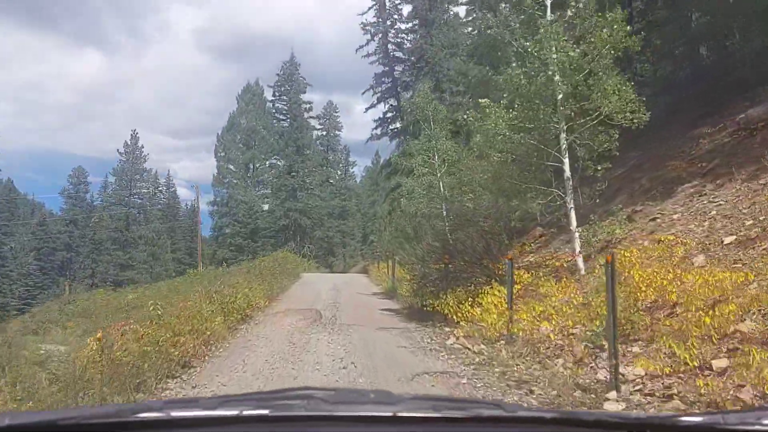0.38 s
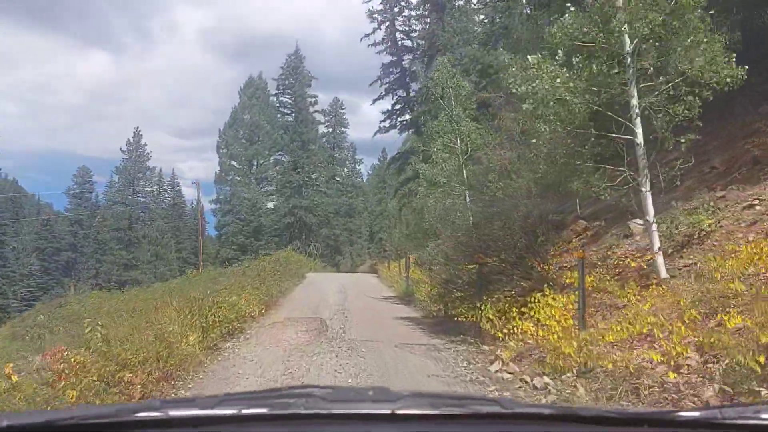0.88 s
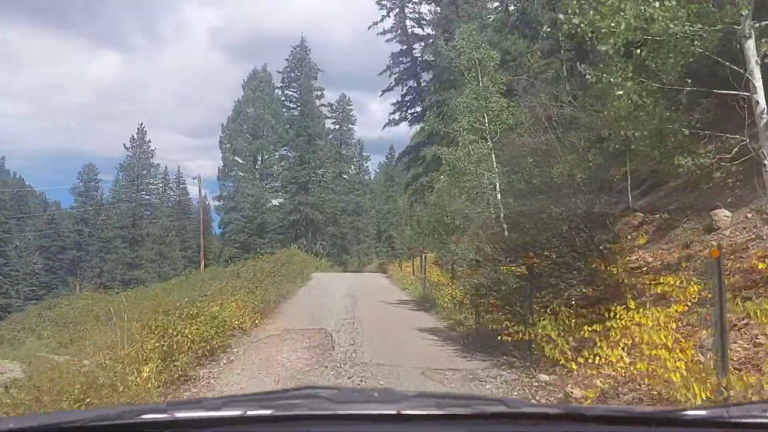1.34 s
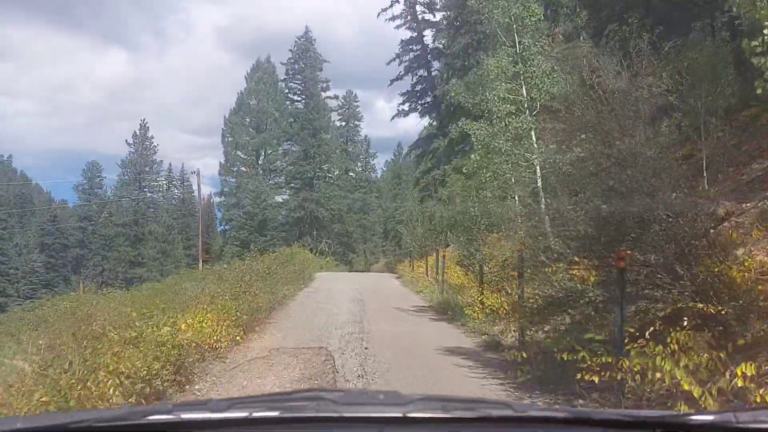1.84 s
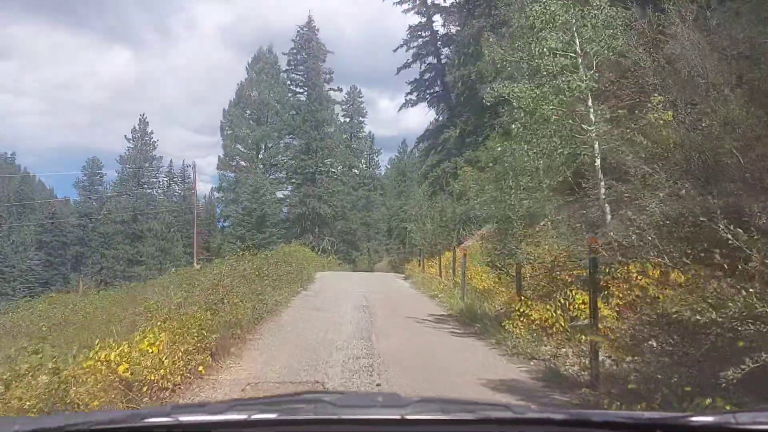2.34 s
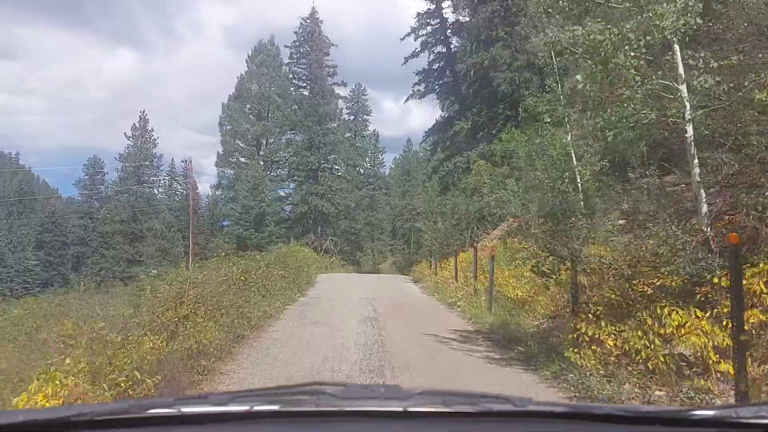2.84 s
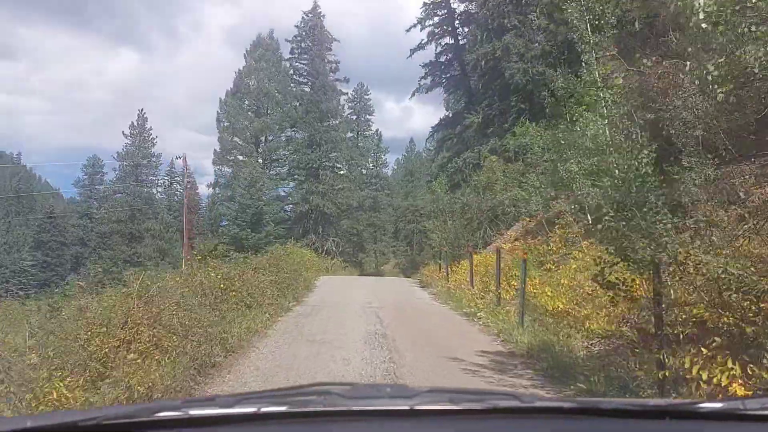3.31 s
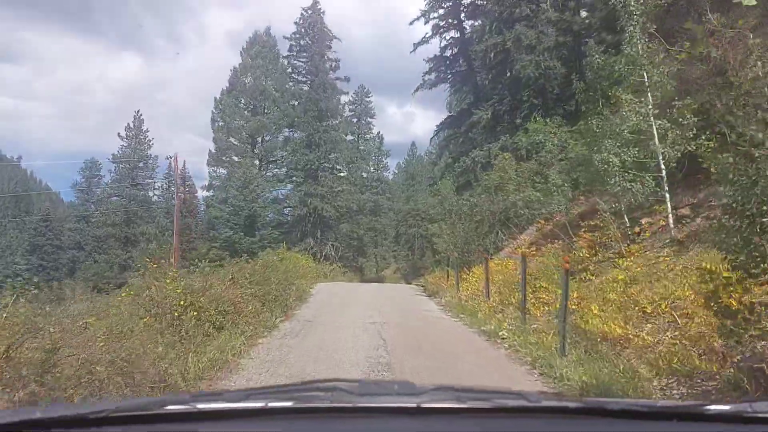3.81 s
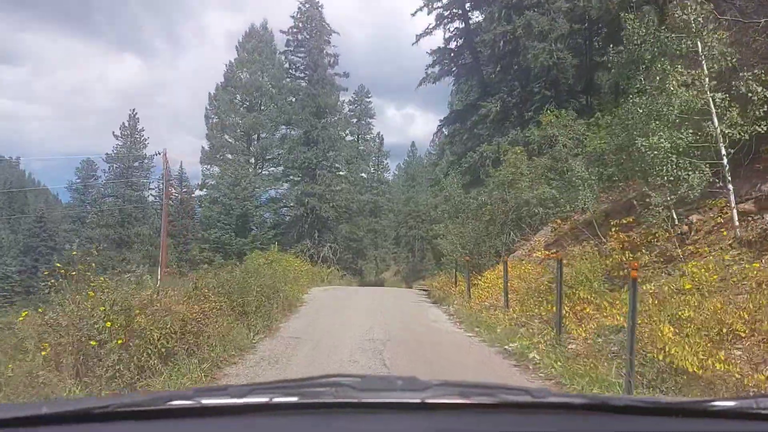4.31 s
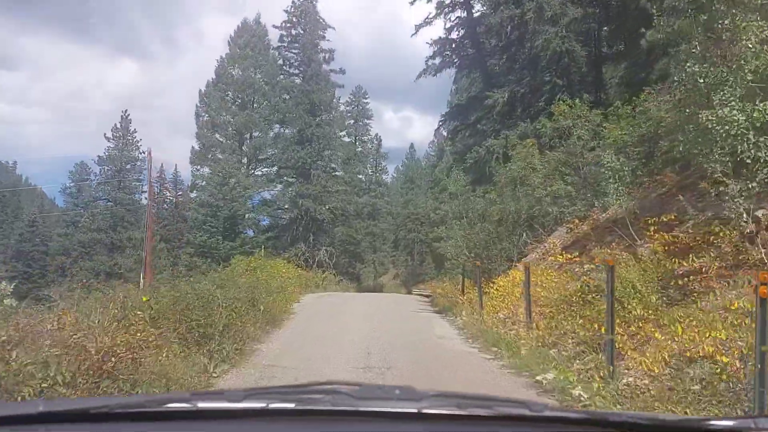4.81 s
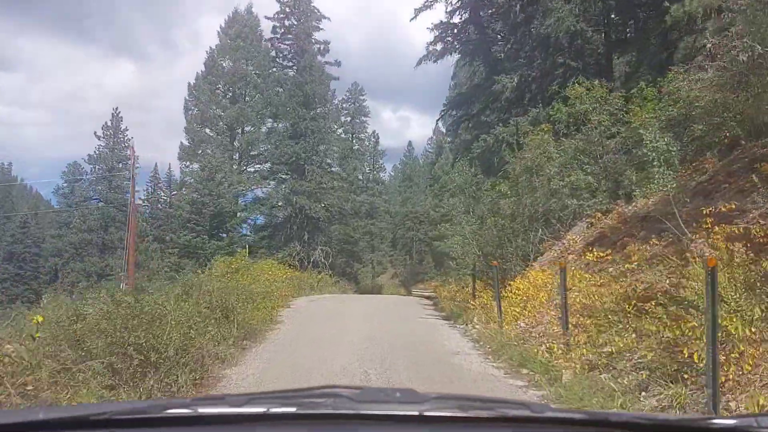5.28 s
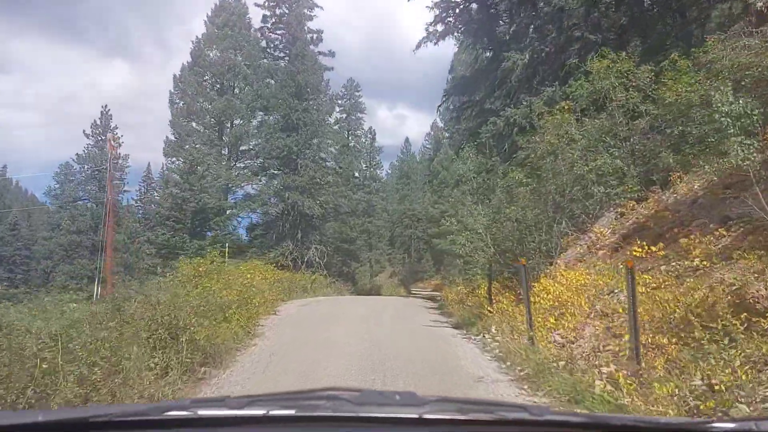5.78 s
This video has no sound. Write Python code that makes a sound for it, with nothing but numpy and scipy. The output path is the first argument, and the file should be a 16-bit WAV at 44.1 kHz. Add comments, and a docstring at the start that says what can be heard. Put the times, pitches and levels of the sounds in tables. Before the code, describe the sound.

About six seconds inside a car rolling slowly on a gravel track, heard by stereo microphones in the closed cabin. Throughout, a deep engine hum near 50 hertz, with its octave, drifts slightly in pitch beneath an uneven boom and low drone from the body; tyre gravel is a muffled roar, treble hiss almost inaudible. From about 0.7 s, and more often after 1.5 s, loose trim gives faint dry rattles, with a tiny bright tick at 2.3 s. A very faint, rough high squeal wavers from 2.5 to 3.6 s. At 3.75 s a pothole hits: a clustered heavy thump, sharp ticks leaning right, clattering plastic. Small pitched knocks follow around 4.1 s, the engine hum swells at 4.2 s, and a low hollow knock sounds at 4.35 s. A second deep jolt lands at 4.5 s with short rattling. After 5 s the ride calms to low humming rumble until the end.

```python
"""An engine hum and the boom of a rough road together: inside a car rolling slowly along a gravel track.
In the cabin, on two channels, road noise and jolts ring the body modes, and sine orders make the hum.
Two potholes jolt the car; loose trim, tapped at random, rattles in short modes, and small knocks ring.
Shaped noise gives the gravel roar, the bright ticks, the puffs of air and a faint hiss;
a gliding tone roughened by narrow noise gives the thin squeal far above the rumble."""
import sys
import numpy as np
from scipy import signal
from scipy.io import wavfile

SR = 44100
rng = np.random.default_rng(int(sys.argv[2]) if len(sys.argv) > 2 else 0)


def inscribe(sig):
    """Save sig as 16-bit PCM at rate SR to the path in sys.argv[1].

    A 1-D sig is mono; a 2-D sig holds one channel per row.
    Samples are clipped to [-1, 1] before scaling.
    """
    pcm = np.round(np.clip(np.atleast_2d(sig).T, -1, 1) * 32767)
    wavfile.write(sys.argv[1], SR, pcm.astype(np.int16))


def invert_db(level):
    """Linear amplitude ratio for a level in decibels (20 dB per decade), elementwise."""
    return 10 ** (np.asarray(level, dtype=float) / 20)


N = 271205  # samples

# In the tables, "colour" levels are relative, per Hz of noise; "likeness" runs from -1 (opposed) to 1 (same).
# Faint treble hiss, colour: [f/Hz, level/dB]
HISS_COLOUR = [(1470, -23), (2500, -11), (3550, -11), (5520, -2), (9730, 0), (12500, -1.5), (15000, -4.5),
               (16300, -3)]
# Faint treble hiss, course: [t/s, level/dB]
HISS_COURSE = [(0, -82), (1.2, -81.5), (2.3, -81), (3.3, -80), (3.6, -81.5), (4.7, -81.5), (5.1, -85),
               (5.8, -83.5), (6.15, -81.5)]
# Puffs of air: [peak t/s, peak level/dB, rise/(dB/s), fall/(dB/s)]
AIR_PUFFS = [(2.488, -61.5, 80.5, 188), (3.844, -66, 298.5, 101), (3.977, -77, 202, 248.5),
             (4.062, -71, 123, 64.5), (4.56, -72, 300, 71.5)]
# Puffs of air, colour: [f/Hz, level/dB]
PUFF_COLOUR = [(1760, -40), (3000, -18.5), (3750, -11), (8820, -8.5), (10000, -8), (14500, -5.5),
               (16000, -11.5)]
# Squeal, glide before each copy's ratio and offset: [t/s, f/Hz, level/dB]
SQUEAL_GLIDE = [(2.5, 10750, -71.5), (2.62, 10460, -74.5), (2.9, 10400, -76.5), (3.05, 10510, -83),
                (3.2, 10400, -79), (3.28, 10250, -71), (3.33, 10250, -74.5), (3.45, 10370, -80.5),
                (3.6, 10460, -85.5)]
# Lower partner of the squeal: [t/s, f/Hz, level/dB]
LOW_SQUEAL_GLIDE = [(2.53, 5880, -83.5), (2.65, 5680, -80.5), (2.78, 5500, -82.5), (2.86, 5450, -96),
                    (2.95, 5420, -85.5), (3.0, 5420, -94)]
# Bright ticks: [t/s, level before panning/dB, t60/s, left over right/dB, top octave over the rest/dB]
BRIGHT_TICKS = [(1.506, -65, .07, 6.5, 0), (1.565, -64, 0.083, 3, -1), (2.211, -70.5, 0.057, -0.5, 0),
                (2.2836, -54, .06, -0.5, -1.5), (3.7398, -58, 0.063, -2.5, -6),
                (3.750, -58.5, 0.044, -4.5, -5), (3.759, -55, 0.044, -3.5, -2),
                (3.7786, -45, 0.043, -6, 8.5), (3.8379, -64, 0.072, -4.5, -2),
                (4.4962, -67.5, 0.09, -5.5, 0), (4.512, -59, 0.059, 1, 2.5), (4.5215, -57, 0.07, 1, 4.5),
                (4.549, -67.5, 0.11, -1.5, -3), (5.186, -78, 0.07, -8.5, -14), (5.459, -74, 0.17, -2.5, 5)]
# Ticks, colour of the main part: [f/Hz, level/dB]
TICK_MAIN_COLOUR = [(3000, -10), (5000, -2), (7500, -4.5), (10000, -0.5)]
# Ticks, colour of the top octave: [f/Hz, level/dB]
TICK_TOP_COLOUR = [(9500, -8.5), (11000, -7.5), (12200, -0.5), (13200, -3.5), (14300, -5), (15700, -12)]
# Ticks across the two channels: [f/Hz, left-right likeness]
TICK_STEREO = [(3000, .6), (6400, .5), (9500, -0.38), (13000, .4)]
# Small pitched knocks, before the pair is summed and softened: [t/s, level/dB, f/Hz, t60/s]
PITCHED_KNOCKS = [(2.802, -49, 914, 0.059), (3.071, -58.5, 1861, 0.049), (3.507, -56.5, 3000, 0.05),
                  (3.516, -53.5, 2800, .04), (3.527, -60, 2980, .04), (3.536, -58, 2450, .04),
                  (4.075, -46, 988, .08), (4.092, -45, 932, .08), (4.108, -48, 900, .08),
                  (4.353, -31, 324, 0.095), (4.560, -49, 2350, 0.038), (4.571, -48.5, 2410, 0.048)]
# Dull modes of the loose trim: [f/Hz, relative level/dB, t60/s]
DULL_TRIM = [(1270, 1.5, 0.024), (1515, 0.5, 0.018), (1686, 3.5, 0.011), (1820, 1.5, 0.023),
             (2045, -2, 0.027), (2250, -9, 0.037), (2350, -19, 0.018)]
# Bright modes of the loose trim: [f/Hz, relative level/dB, t60/s]
BRIGHT_TRIM = [(2510, 0, 0.016), (2800, -2.5, 0.0078), (2980, -5.5, 0.0093), (3270, -6, 0.0034),
               (3760, -5.5, 0.0061), (4300, -8, 0.0097), (5040, -12, 0.012)]
# Bumps that set the trim rattling: [t/s, dull level/dB, t60/s, bright over dull/dB]
TRIM_BUMPS = [(0.675, -65, 0.57, -12), (1.505, -71, .4, -8), (1.56, -64, .4, -9), (1.625, -71, 0.31, -23.5),
              (1.684, -64.5, 0.23, -20), (1.74, -63.5, 0.39, -22), (1.915, -65.5, .3, -18),
              (1.955, -71.5, .4, -20), (2.075, -62.5, 0.54, -34), (2.28, -65, 0.47, -11),
              (2.59, -68.5, 0.32, -16.5), (2.88, -63.5, 0.66, -20), (3.06, -72.5, .3, -22),
              (3.135, -66.5, 0.42, -14), (3.21, -58.5, 0.31, -23.5), (3.305, -61, 0.35, -14),
              (3.36, -65.5, .35, -19), (3.50, -57, 0.33, -8), (3.68, -64.5, .3, -31),
              (3.735, -43.5, 0.37, -10), (3.763, -48.5, 0.38, -4), (3.814, -49, 0.24, -14.5),
              (3.885, -62, 0.25, -17), (3.95, -73.5, 0.17, -11), (4.01, -66, 1, -12),
              (4.345, -65, 0.17, -26), (4.482, -57, 0.44, -17.5), (4.50, -52, .3, -12.5),
              (4.513, -46.5, 0.17, -2.5), (4.555, -50, 0.22, -7), (4.61, -62, 0.32, -6),
              (4.685, -68, 0.48, -16), (4.785, -68, 0.3, -9.5), (4.86, -66.5, .3, -12),
              (4.935, -68, 0.26, -20.5)]
# Engine: [t/s, firing rate f/Hz, level before the order's own/dB, second order above its usual share/dB]
ENGINE_COURSE = [(0, 49.42, -23, 0.5), (0.3, 50.5, -28, -2.5), (0.9, 51.81, -28.5, -1),
                 (1.5, 51.98, -28, -5.5), (1.9, 54.8, -31, 3.5), (2.3, 56.72, -33.5, 7),
                 (2.7, 56.85, -30.5, 0.5), (3.1, 57.5, -31, 2), (3.5, 55.62, -32.5, -7),
                 (3.8, 50.69, -26, 0), (4.0, 48.28, -28.5, -15), (4.2, 48.84, -20, -2.5),
                 (4.45, 50, -35.5, 3), (4.8, 52.88, -29.5, 1), (5.1, 54, -31, -2), (5.4, 55.05, -35, -5),
                 (5.8, 55.33, -35, 8), (6.0, 57.59, -27, -6), (6.15, 57.43, -35, 11.5)]
# Engine orders: [multiple of firing rate, level/dB, share of the level swing followed, left-right likeness]
FIRING_ORDERS = [(1, 0.5, 0.91, 0.97), (2, -3, 0.92, .9), (3, -20, 0.33, 0.94), (4, -19, 0.15, 0.17)]
# Gravel under the tyres, colour: [f/Hz, level/dB]
TYRE_COLOUR = [(250, -29), (420, -1.5), (443, -3.5), (484, -3), (588, -9), (643, -10), (901, -9),
               (1300, -30.5), (1800, -31), (2390, -43), (3500, -46.5), (4550, -76), (7700, -120)]
# Noises across the two channels: [f/Hz, left-right likeness]
NOISE_STEREO = [(60, 0.9), (180, 0.87), (550, 0.3), (1300, -0.1), (4970, 0.019), (15000, 0.69)]
# Lean of the noises: [f/Hz, left over right/dB]
NOISE_LEAN = [(60, -0.31), (150, 0.5), (380, -0.5), (950, 0.7), (2380, 0.95), (5980, 0.0), (15000, -0.5)]
# Road: [t/s, body boom/dB, body drone/dB, steady chatter of loose trim before its flicker/dB]
ROAD_COURSE = [(0, -33.5, -42, -81), (0.5, -25, -41, -86.5), (0.75, -28, -38, -84.5),
               (1.0, -30, -40.5, -84), (1.25, -22.5, -37.5, -78.5), (1.5, -26.5, -38, -72),
               (1.9, -22.5, -37, -73), (2.35, -24, -40, -77.5), (2.75, -24.5, -40, -75.5),
               (3.0, -21.5, -35.5, -74), (3.3, -29, -38.5, -73), (3.6, -28, -44, -74),
               (3.85, -25.5, -35.5, -68), (4.1, -29, -43.5, -73), (4.42, -25, -43, -74),
               (4.56, -28.5, -36, -67.5), (4.8, -32, -47, -63), (5.25, -35.5, -44.5, -79.5),
               (5.75, -32.5, -43.5, -78.5), (6.15, -28.5, -43, -70)]
# Jolts, before mode levels and chance: [t/s, boom level/dB, drone level/dB]
JOLT_BLOWS = [(3.717, -35, -25), (3.737, -18, -17.5), (3.748, -17, -26), (3.759, -22, -44),
              (3.772, -12, -20.5), (3.789, -16, -30), (3.805, -19, -25), (3.826, -25, -27),
              (3.96, -25, -37), (4.481, -16, -31), (4.506, -32.5, -29), (4.521, -7.5, -29),
              (4.539, -16.5, -28), (4.553, -33, -27.5), (4.567, -14, -33), (4.584, -20.5, -36.5),
              (4.629, -35, -37)]
# Booming cabin modes: [f/Hz, width/Hz, relative level on the road/dB, level in a jolt/dB, left-right likeness]
CABIN_MODES = [(34.3, 3.4, -11, -18.5, 0.93), (40.65, 4.9, -3.5, 1.5, 0.97), (62.4, 9, -8.5, 0.5, .98),
               (82.2, 12, 1.5, -6, .92), (85.15, 1.8, -10.5, -15, 0.69), (111.1, 11, -3.5, -4, 1),
               (129.83, 14, -2, 7.5, 0.94), (157.65, 3.3, -16.5, -15, -0.31)]
# Droning body modes: [f/Hz, width/Hz, relative level on the road/dB, level in a jolt/dB, left-right likeness]
DRONE_MODES = [(180, 83, -9.5, -9.5, 0.99), (218.6, 42, -3.5, 3, 0.81), (239.6, 18, -3, 1.5, 1),
               (270.9, 24, -2, 0.5, 0.66), (300, 26, -6.5, 4, .9), (345.2, 36, -4.0, -22, 0.7),
               (389.4, 36, -11.5, -40, 0.94)]

SIDES = np.array([[1], [-1]])  # left, right
BUMP_RISE_S, CHATTER_BRIGHT_DB = 0.01, -15  # bright trim relative to dull in the steady chatter
ROAR_DB, ROAR_FOLLOWS_DRONE = -54, 0.66  # tyre roar on mean road, dB per dB of drone swing
REFERENCE_BUMP_DB = -63
THUD_DB, THUD_FOLLOWS_BUMP = -54, 0.85  # roar added by a reference bump, dB per dB beyond it


def rms_one(x):
    """Scales to rms 1."""
    return x / np.sqrt(np.mean(x ** 2) + 1e-20)


def in_time(rows):
    """Joins table rows by straight lines in time."""
    s, *columns = np.transpose(rows)
    return [np.interp(np.arange(N) / SR, s, c) for c in columns]


def gated(rows):
    """As in_time, but the last column falls to -130 dB within 30 ms outside the table."""
    first, last = list(rows[0]), list(rows[-1])
    before = [first[0] - 0.03, *first[1:-1], -130]
    after = [last[0] + 0.03, *last[1:-1], -130]
    return in_time([before, *rows, after])


def at_hz(points, hz):
    """Reads a spectrum on a log-frequency axis."""
    point_hz, values = np.array(points).T
    return np.interp(np.log(hz), np.log(np.maximum(point_hz, 1)), values)


def drift(rate_hz):
    """Slow chance of rms 1: noise through two equal poles, computed at every 40th sample."""
    r = np.exp(-80 * np.pi * rate_hz / SR)
    noise = rng.standard_normal(N // 40 + 2002)
    slow = signal.lfilter([1], [1, -2 * r, r * r], noise)[2000:]  # skip the settling
    return np.interp(np.arange(N) / 40, np.arange(len(slow)), rms_one(slow))


def spread(mid, side, alike):
    """Left and right from a shared and an opposed part."""
    alike = np.clip(alike, -1, 1)
    return np.sqrt((1 + alike) / 2) * mid + np.sqrt((1 - alike) / 2) * side * SIDES


def ring(clicks, hz, t60):
    """A damped resonator: a unit click sets a sine of height 1 ringing."""
    r, w = invert_db(-60 / (t60 * SR)), 2 * np.pi * hz / SR
    return signal.lfilter([0, np.sin(w)], [1, -2 * r * np.cos(w), r * r], clicks + 1e-18)


def strikes(times, sizes):
    """A click train."""
    out = np.zeros(np.shape(sizes)[:-1] + (N,))
    out[..., np.round(np.asarray(times) * SR).astype(int)] = sizes
    return out


def banded_noise(colour, patchy_db, likeness=NOISE_STEREO):
    """About quarter-octave bands of stereo noise, each with its level, flicker, likeness and lean; rms 1."""
    out, together, white = 0, drift(36.0), rng.standard_normal((2, 2, N))
    bottom, top = colour[0][0], colour[-1][0]
    edges = np.geomspace(bottom, top, 2 + int(4 * np.log2(top / bottom)))
    for k, (low, high) in enumerate(zip(edges, edges[1:])):
        band = signal.butter(2, [low, high], "band", fs=SR, output="sos")
        mid, side = signal.sosfilt(band, white[k % 2])  # neighbouring bands use separate noise
        hz = np.sqrt(low * high)
        flicker_db = patchy_db * (0.24 * together + drift(5.1))
        gain = invert_db(at_hz(colour, hz) + flicker_db)
        lean = invert_db(at_hz(NOISE_LEAN, hz) / 2 * SIDES)
        out = out + gain * spread(mid, side, at_hz(likeness, hz)) * lean
    return rms_one(out)


def hiss():
    """Faint treble noise on a slow level course."""
    level_db, = in_time(HISS_COURSE)
    return invert_db(level_db) * banded_noise(HISS_COLOUR, patchy_db=-0.5)


def air():
    """Each puff of noise swells and fades at a steady rate in dB."""
    t, gain = np.arange(N) / SR, 0
    for s, db, rise, fall in AIR_PUFFS:
        below_peak_db = np.where(t < s, rise * (s - t), fall * (t - s))
        gain = gain + invert_db(db - below_peak_db)
    return gain * banded_noise(PUFF_COLOUR, patchy_db=2.5)


def squeal(rows, width_hz, ratio=1, db=0):
    """A rough, broken whistle: a gliding tone times a narrow noise."""
    hz, level_db = gated(rows)
    phase = 2 * np.pi * ratio * np.cumsum(hz) / SR
    low = signal.butter(2, width_hz / 2, fs=SR, output="sos")
    a, b = signal.sosfilt(low, rng.standard_normal((2, 2, N)))
    gain = invert_db(level_db + db + 2.8 * drift(14))
    return gain * rms_one(a * np.cos(phase) + b * np.sin(phase))


def ticks():
    """Each tick is a burst of bright noise, rising in 1.5 ms and dying fast."""
    main, top, t = np.zeros((2, N)), np.zeros((2, N)), np.arange(N) / SR
    for s, db, t60, pan_db, top_db in BRIGHT_TICKS:
        after = np.maximum(t - s, 0)
        envelope = np.minimum(after / 0.0015, 1) * invert_db(-60 * after / max(t60, 0.005))
        burst = invert_db(db + pan_db / 2 * SIDES) * envelope
        main = main + burst
        top = top + invert_db(top_db) * burst
    main_noise = banded_noise(TICK_MAIN_COLOUR, patchy_db=4.5, likeness=TICK_STEREO)
    top_noise = banded_noise(TICK_TOP_COLOUR, patchy_db=1.5, likeness=TICK_STEREO)
    return main * main_noise + top * top_noise


def knocks():
    """Each knock rings a close pair of modes, split differently at each ear."""
    out, luck = 0, rng.normal(0, 1, (len(PITCHED_KNOCKS), 4))
    for (s, db, hz, t60), split in zip(PITCHED_KNOCKS, luck):
        click = strikes([s], [invert_db(db - 1.5)])
        modes = np.array([ring(click, hz * (1 + 0.04 * detune), t60) for detune in split])
        out = out + modes[:2] + modes[2:]
    softened = signal.lfilter([0.3], [1, -0.7], out)
    return signal.sosfilt(signal.butter(2, 220, "high", fs=SR, output="sos"), softened)


def bumps():
    """Each bump swells quickly and dies away; gains for dull trim, bright trim and thud, added as powers."""
    power, t = np.zeros((3, N)), np.arange(N) / SR
    for s, db, t60, bright_db in TRIM_BUMPS:
        after = np.maximum(t - s, 0)
        decay = invert_db(-60 * np.maximum(after - BUMP_RISE_S, 0) / max(t60, 0.02))
        shape = np.minimum(after / BUMP_RISE_S, 1) * decay
        thud_db = THUD_DB + THUD_FOLLOWS_BUMP * (db - REFERENCE_BUMP_DB)
        levels_db = np.array([[db], [db + bright_db], [thud_db]])
        power += (invert_db(levels_db) * shape) ** 2
    return np.sqrt(power)


def trim_modes(taps, modes):
    """Taps ring short plastic modes, each with chance signs and sizes per ear; rms 1."""
    out = 0
    for hz, db, t60 in modes:
        out = out + invert_db(db) * ring(taps * rng.standard_normal((2, N)), hz, t60)
    return rms_one(out)


def rattle(dull_gain, bright_gain):
    """Uneven taps of loose trim, some 2500 a second, ring its dull and bright modes."""
    sizes = invert_db(3.6 * np.minimum(rng.exponential(1, N), 5))
    taps = sizes * (rng.random(N) < 2500 / SR)
    both = dull_gain * trim_modes(taps, DULL_TRIM) + bright_gain * trim_modes(taps, BRIGHT_TRIM)
    return both * invert_db(0.5 * SIDES)


def trim(chatter_db, dull, bright):
    """Loose trim chatters steadily with a flicker, and rattles harder at the bumps."""
    chatter = invert_db(chatter_db + 2.2 * drift(9.0))
    return rattle(np.hypot(chatter, dull), np.hypot(chatter * invert_db(CHATTER_BRIGHT_DB), bright))


def engine():
    """Low firing orders on one slightly unsteady crank, each wavering in level."""
    hz, level_db, second_db = in_time(ENGINE_COURSE)
    phase = 2 * np.pi * np.cumsum(hz) / SR + 0.12 * drift(2.0)  # wobble in radians
    mean_db, out = level_db.mean(), 0
    for multiple, order_db, follows, alike in FIRING_ORDERS:
        turn = multiple * phase + rng.uniform(0, 2 * np.pi)
        db = order_db + mean_db + follows * (level_db - mean_db)
        db = db + second_db * (multiple == 2) + 2.7 * drift(5.0)
        out = out + invert_db(db) * spread(np.sin(turn), np.cos(turn), alike)
    return np.sqrt(2) * out


def tyres(drone_db, thud):
    """Gravel roar follows the road's roughness, with a thud added at each bump."""
    rough_db = drone_db - drone_db.mean()
    roar = invert_db(ROAR_DB + ROAR_FOLLOWS_DRONE * rough_db)
    return np.hypot(roar, thud) * banded_noise(TYRE_COLOUR, patchy_db=2.0)


def body(modes, road_db, jolt_db):
    """The road's random shaking and the jolts ring the same modes."""
    shaken, jolted, times = 0, 0, np.array(JOLT_BLOWS)[:, 0]
    luck = rng.normal(0, 1, (len(times), len(modes), 2))
    for k, (hz, width_hz, on_road_db, in_jolt_db, alike) in enumerate(modes):
        t60 = np.log(1000) / (np.pi * width_hz)
        once = ring(rng.standard_normal((2, N)), hz, t60)
        mid, side = rms_one(ring(once, hz, t60 / 2))  # rung twice: steep skirts
        shaken = shaken + invert_db(on_road_db + 3.1 * drift(4.1)) * spread(mid, side, alike)

        blows = -strikes(times, invert_db(jolt_db + in_jolt_db + 3.2 * luck[:, k].T))
        soft = np.exp(-2 * np.pi * 1.06 * hz / SR)  # rubber softens the blow
        softened = signal.lfilter([(1 - soft) ** 2], [1, -2 * soft, soft ** 2], blows)
        mid, side = ring(softened, hz, t60)
        jolted = jolted + spread(mid, side, alike)
    high = signal.butter(2, 38.0, "high", fs=SR, output="sos")
    return invert_db(road_db) * rms_one(shaken) + signal.sosfilt(high, jolted)


def scene():
    """Everything heard in the cabin."""
    boom_db, drone_db, chatter_db = in_time(ROAD_COURSE)
    _, jolt_boom_db, jolt_drone_db = np.array(JOLT_BLOWS).T
    dull, bright, thud = bumps()
    road = body(CABIN_MODES, boom_db, jolt_boom_db) + body(DRONE_MODES, drone_db, jolt_drone_db)
    low = road + tyres(drone_db, thud)
    loose_trim = trim(chatter_db, dull, bright)
    whistles = squeal(SQUEAL_GLIDE, width_hz=750, db=-1.0)
    whistles = whistles + squeal(SQUEAL_GLIDE, width_hz=900, ratio=1.45, db=-7.0)
    whistles = whistles + squeal(LOW_SQUEAL_GLIDE, width_hz=180)
    faint = whistles + hiss()
    return low + loose_trim + faint + engine() + ticks() + knocks() + air()


def low_pass(x):
    """Removes everything above the highest recorded frequency."""
    return signal.sosfilt(signal.butter(12, 15780, fs=SR, output="sos"), x)


def record(dry):
    """The microphones cut the deepest bass, below about 34 Hz."""
    cut = signal.sosfilt(signal.butter(3, 34.0, "high", fs=SR, output="sos"), dry)
    return low_pass(cut)


dry = scene()
out = record(dry)
inscribe(out)
```